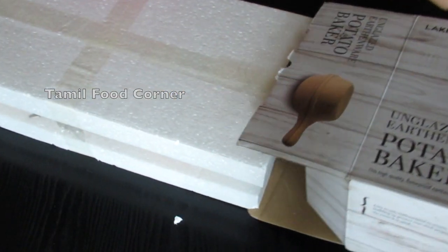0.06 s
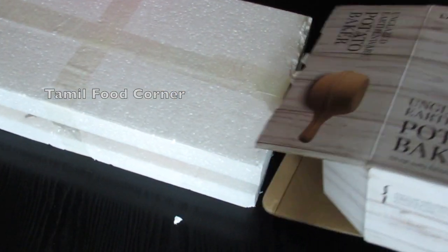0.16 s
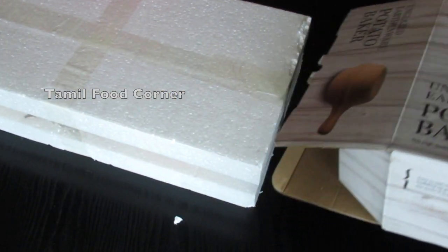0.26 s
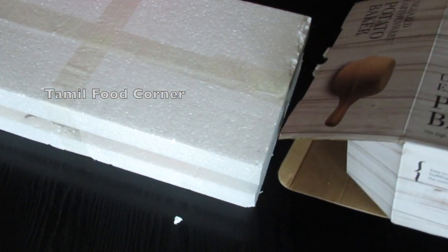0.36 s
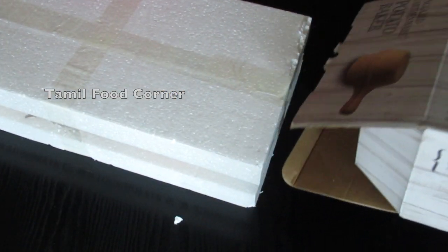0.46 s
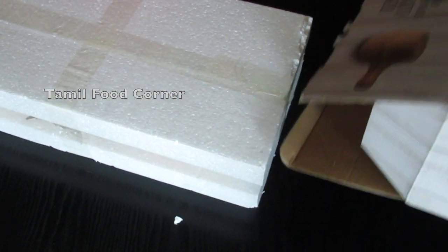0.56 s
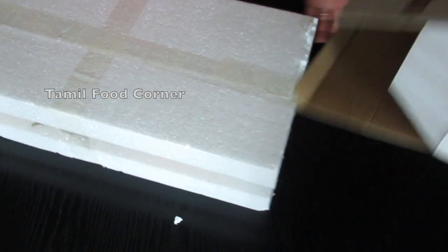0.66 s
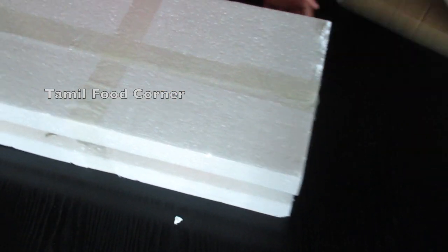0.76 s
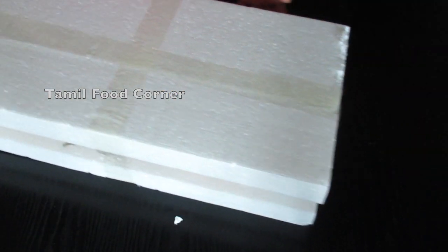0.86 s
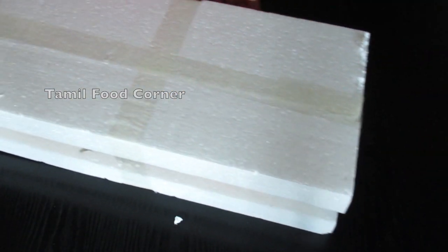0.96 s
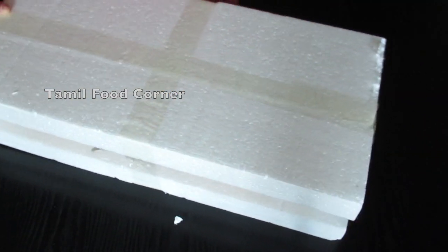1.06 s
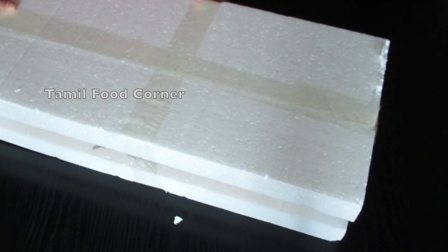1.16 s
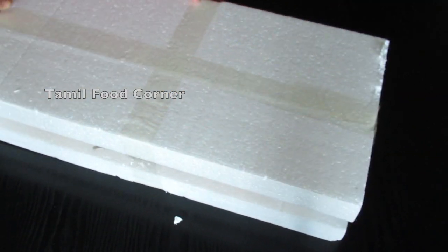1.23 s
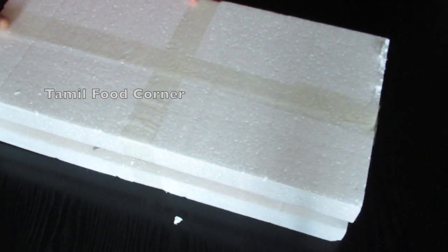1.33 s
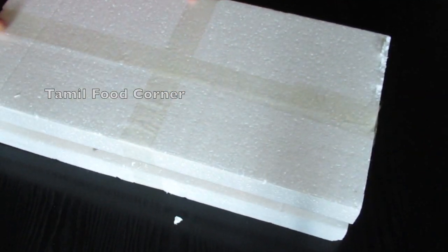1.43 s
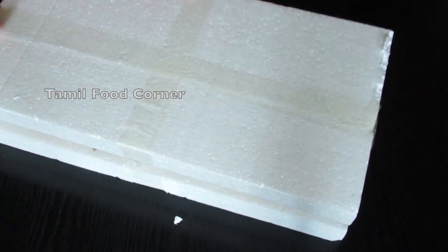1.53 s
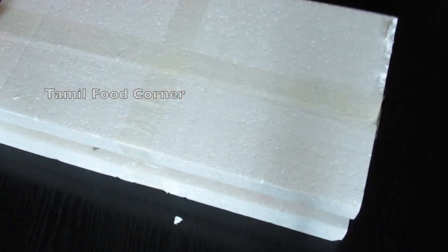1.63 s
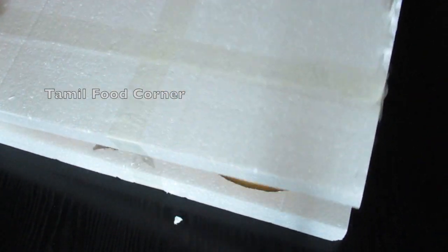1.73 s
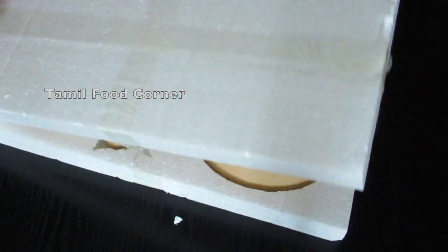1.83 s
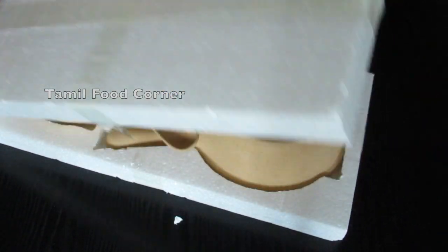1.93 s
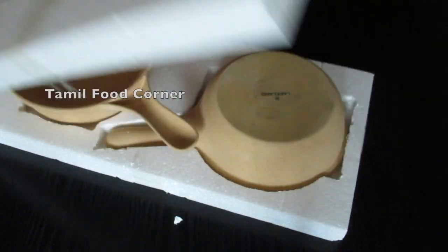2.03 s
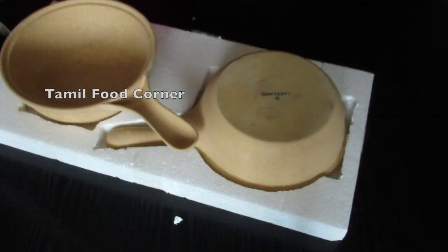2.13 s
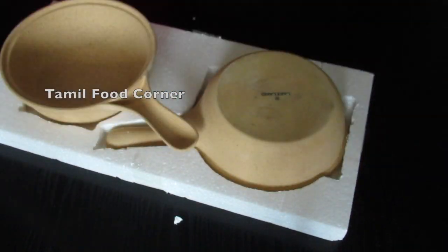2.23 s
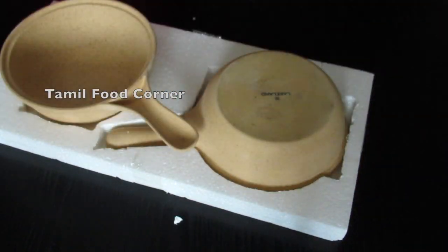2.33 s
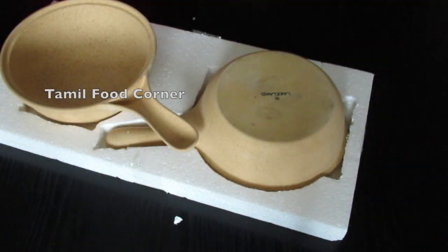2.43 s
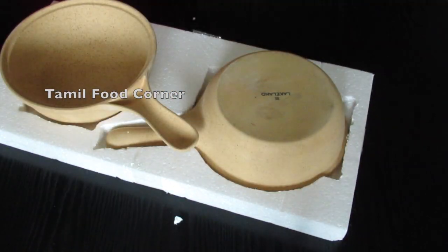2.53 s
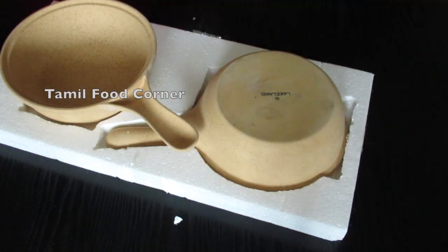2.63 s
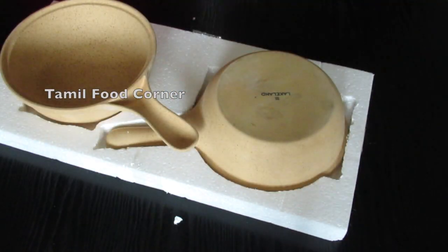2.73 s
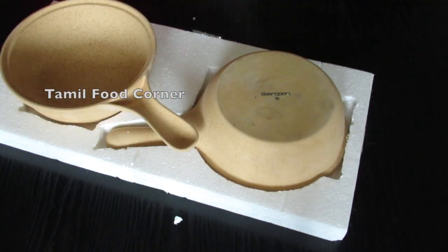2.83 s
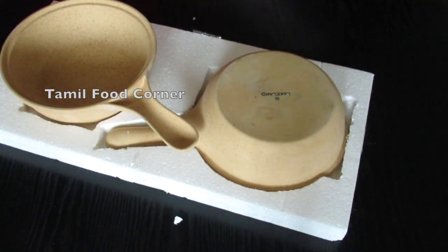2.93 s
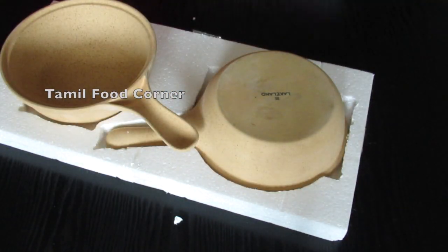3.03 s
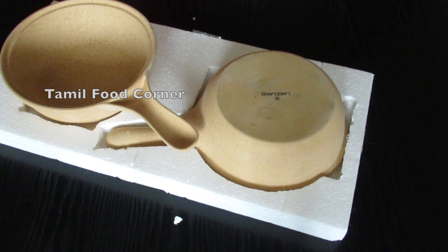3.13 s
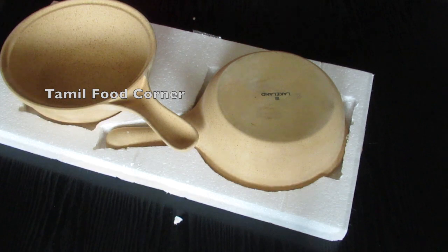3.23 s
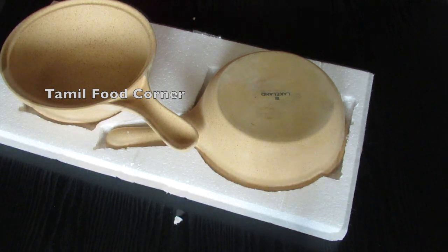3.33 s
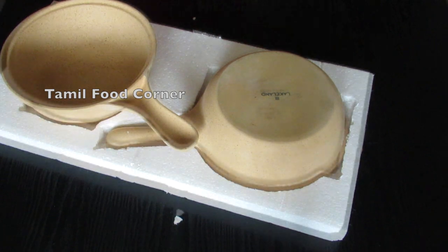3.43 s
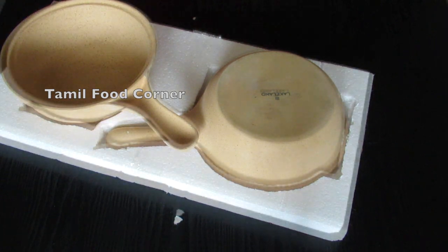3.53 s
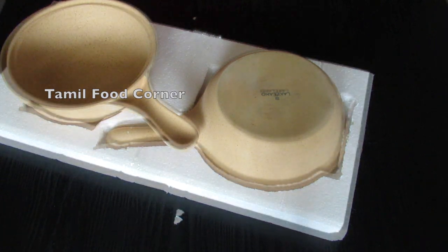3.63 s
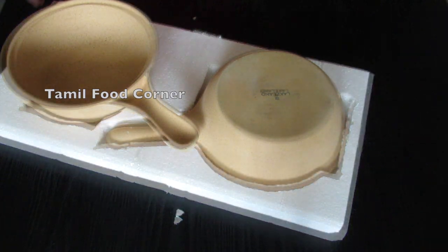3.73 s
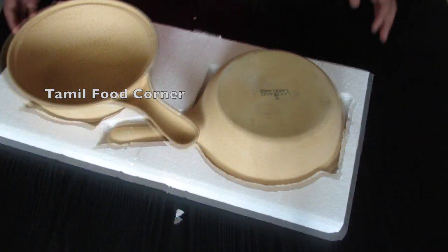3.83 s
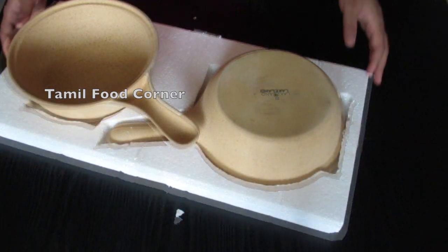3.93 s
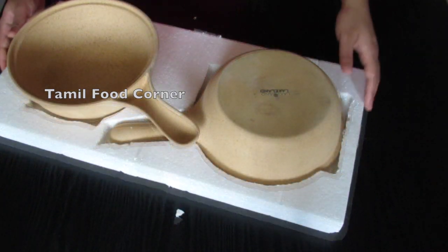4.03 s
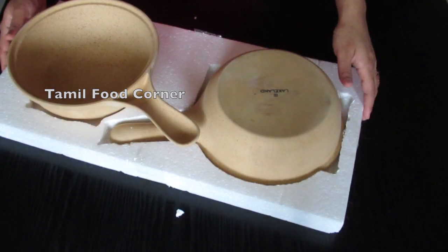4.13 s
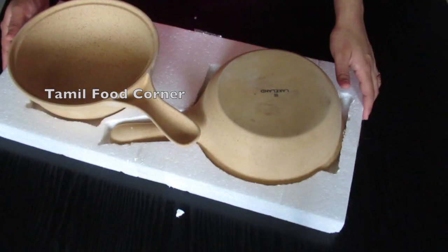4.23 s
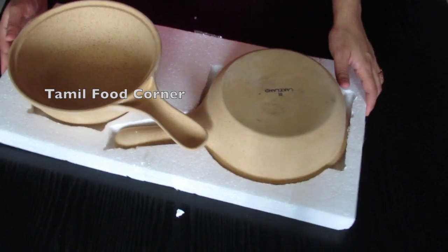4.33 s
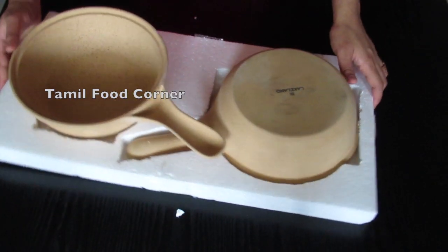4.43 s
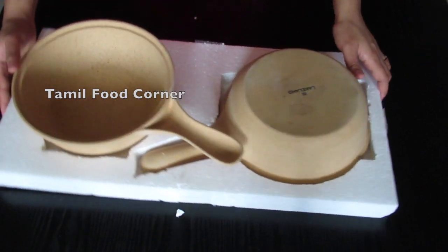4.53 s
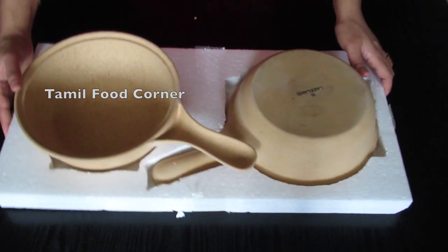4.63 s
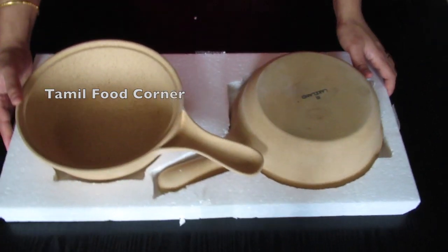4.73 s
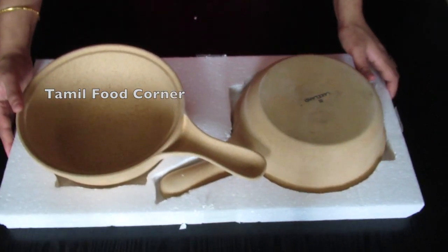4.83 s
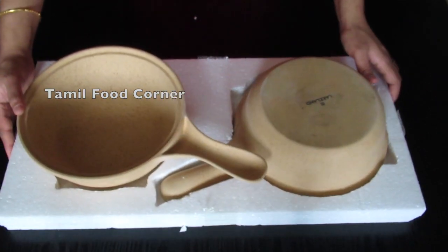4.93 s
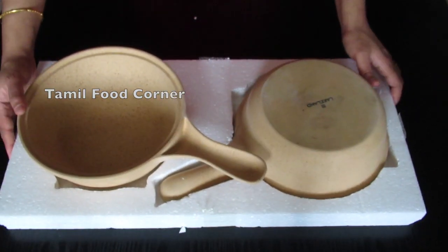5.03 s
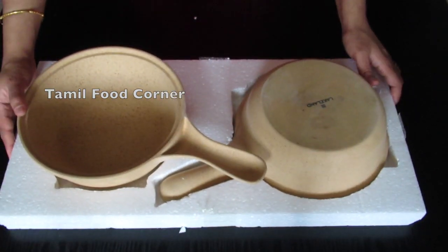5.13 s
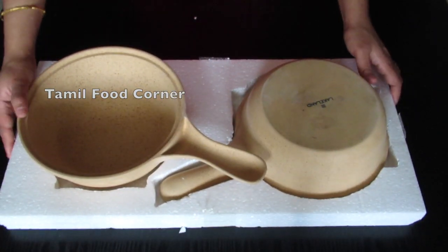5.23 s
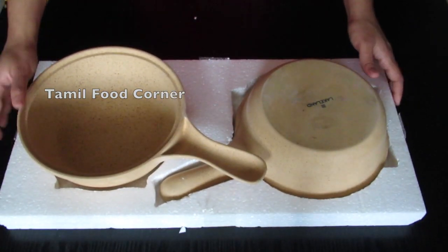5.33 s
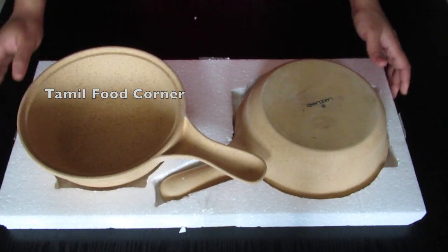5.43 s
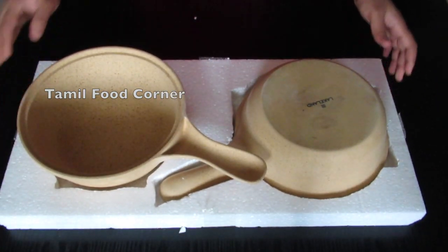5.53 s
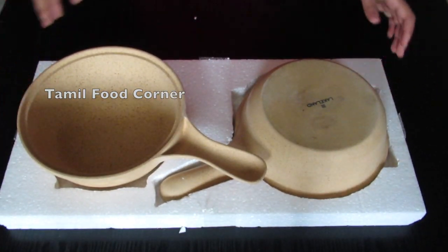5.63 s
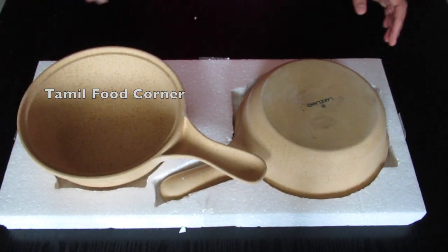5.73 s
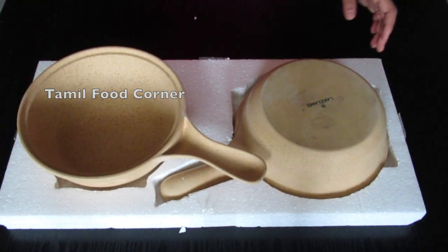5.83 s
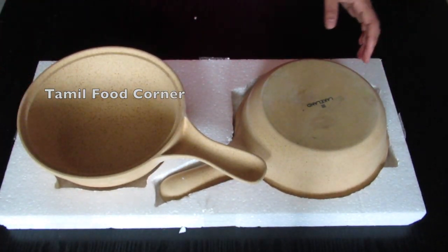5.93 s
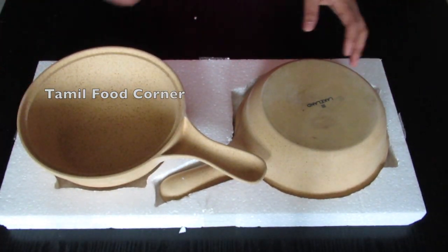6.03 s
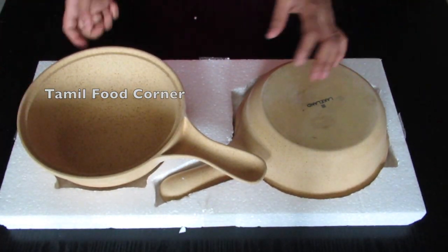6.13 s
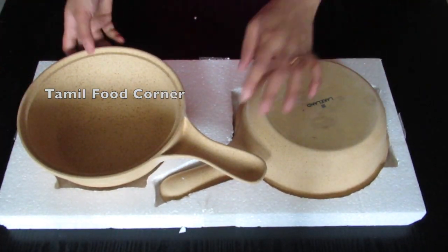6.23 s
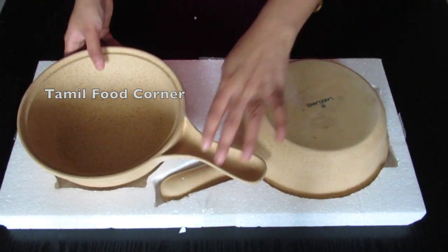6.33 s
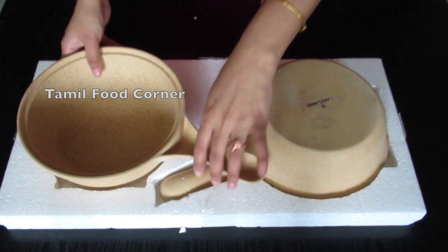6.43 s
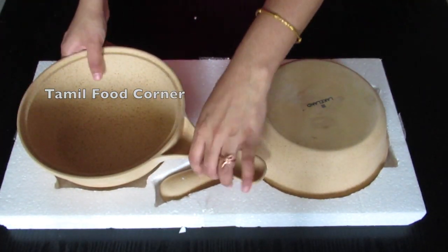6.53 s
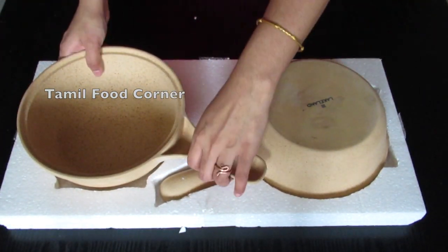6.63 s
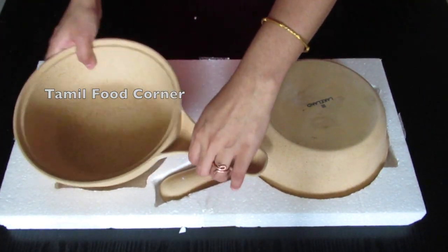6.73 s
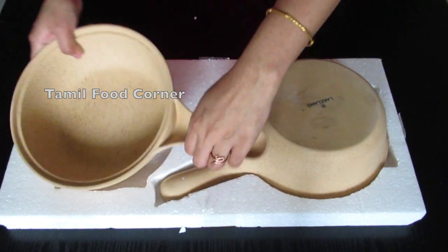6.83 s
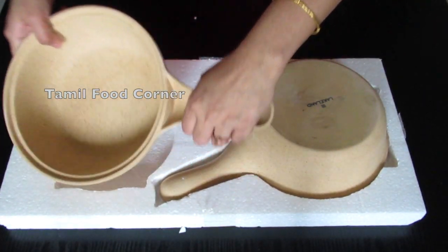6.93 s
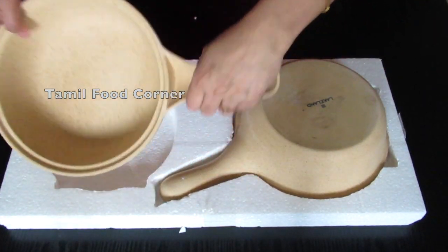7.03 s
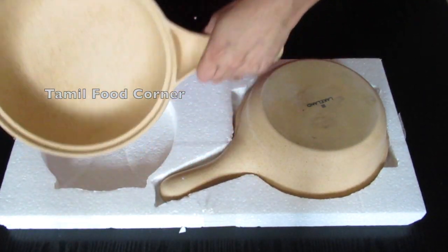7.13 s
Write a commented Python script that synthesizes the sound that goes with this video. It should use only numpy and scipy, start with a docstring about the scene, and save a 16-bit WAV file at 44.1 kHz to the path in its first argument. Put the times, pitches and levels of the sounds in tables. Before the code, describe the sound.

Dry, grainy rubbing of foam packaging is heard close up in a small, quiet room. First card scrapes and snaps, then the block slides on a tabletop and its lid squeaks sharply as it comes off. Quieter handling, ticks and creaks follow, then a longer hissing scrape as the tray is turned. After a lull with a faint bangle ping, an earthenware dish rubs out of the foam with a short ring.

```python
"""Earthenware unpacked from polystyrene at a table; close, mono, small room.
A card sleeve drags off with bumps and snaps (0 s), then the foam block slides (0.6 s). Its lid
squeaks free (1.5 s) and is put aside, creaking (2.3 s). The tray is turned on the rumbling table
(3.9 s). A bangle pings (5.8 s). A hand reaches in with a faint rustle (6.1 s); a dish scrapes out
of the foam (6.5 s) and rings (6.8 s). Every rub is a dense rain of tiny bead slips."""
import sys
import numpy as np
from scipy import signal
from scipy.fft import rfft, irfft
from scipy.io import wavfile

SR = 44100
rng = np.random.default_rng(int(sys.argv[2]) if len(sys.argv) > 2 else 0)


def master(y):
    """Save y as 16-bit WAV."""
    cut = np.clip(np.atleast_2d(y).T, -1, 1)
    pcm = np.round(cut * 32767)  # scale
    wavfile.write(sys.argv[1], SR, pcm.astype(np.int16))


N = 316197
TIME_S = np.arange(N) / SR
FREQ_HZ = np.maximum(np.arange(N // 2 + 1) * SR / N, 1)


def undb(db):
    """Decibels to gain."""
    return 10 ** (np.asarray(db) / 20)


def unit(x):
    """Scale to rms 1."""
    return x / np.sqrt(np.mean(x ** 2) + 1e-18)


def shaped(x, gain):
    """Filter by a gain per frequency."""
    return irfft(rfft(x) * gain, N)


def colour(points):
    """Gain per frequency from (f/Hz, level/dB) points."""
    hz, db = np.transpose(points)
    return undb(np.interp(np.log(FREQ_HZ), np.log(hz), db))


def walk(rate_hz):
    """Smooth random drift, rms 1."""
    return unit(shaped(rng.standard_normal(N), 1 / (1 + (FREQ_HZ / rate_hz) ** 4)))


def resonate(x, hz, q):
    """Two-pole band-pass."""
    hz = min(hz, .4 * SR)
    return signal.lfilter(*signal.iirpeak(hz, max(q, hz / (SR / 4)), fs=SR), x)


def fade(t, t60_s):
    """Exponential decay, 60 dB in t60_s."""
    return np.exp(-np.log(1000) * t / t60_s)


def add(out, start_s, sound):
    """Mix a sound in at start_s."""
    i = int(start_s * SR)
    out[i:i + len(sound)] += sound[:N - i]


def effort(start_s, rise_s, hold_s, fall_s, sag_db_per_s=0):
    """Stroke envelope: gathers speed, sags while held, drops 20 dB per fall_s (1 ms at least)."""
    t = TIME_S - start_s
    gather = np.sin(np.pi / 2 * np.clip(t / max(rise_s, 1e-3), 0, 1))
    sag_db = sag_db_per_s * np.clip(t - rise_s, 0, abs(hold_s))
    fall_db = 20 * np.maximum(t - rise_s - hold_s, 0) / max(fall_s, 1e-3)
    return gather * undb(-sag_db - fall_db)


def band_gains(strokes, sag_db_per_s, body_power, hiss_power):
    """Body, scrape and hiss each follow a power of the effort; strokes add in energy."""
    energy = np.zeros((3, N))
    for *timing, db, body_db, hiss_db in strokes:
        push = effort(*timing, sag_db_per_s)
        moving = push > 1e-4
        for band, (band_db, power) in enumerate([(body_db, body_power), (0, 1), (hiss_db, hiss_power)]):
            energy[band, moving] += (undb(db + band_db) * push[moving] ** power) ** 2
    return np.sqrt(energy)


def slips(rate_hz, spread_db):
    """Bead slips at random times: mostly small, a few large."""
    slipping = rng.random(N) < rate_hz / SR
    size = undb(spread_db * np.minimum(rng.standard_normal(N), np.pi))
    return unit(slipping * rng.choice([-1, 1], N) * size)


def rub(gains, spectrum, rate_hz, spread_db, judder_db, block_share, body_hz=1000, hiss_hz=5000):
    """Slips under a juddering grip sound the foam: hollow body, scrape, contact hiss."""
    # foam block resonances: f/Hz, width/Hz, lift at full share/dB
    resonances = [(453, 65, 5.5), (590, 23, 1.5), (730, 33, -3), (766, 36, 4), (890, 26, 4),
                  (1720, 37, -3.5), (1900, 85, 0.5), (2430, 98, 0)]
    lift_db = sum(db / (1 + (2 * (FREQ_HZ - hz) / width_hz) ** 2) for hz, width_hz, db in resonances)
    tone = colour(spectrum) * undb(block_share * lift_db)
    grains = slips(rate_hz, spread_db) * undb(judder_db * walk(25))
    body = 1 / (1 + (FREQ_HZ / body_hz) ** 4)
    hiss = 1 / (1 + (hiss_hz / FREQ_HZ) ** 4)
    bands = body, 1 - body - hiss, hiss
    sound = sum(gain * unit(shaped(grains, tone * band)) for band, gain in zip(bands, gains))
    ticks = unit(shaped(slips(rate_hz=100, spread_db=3), hiss))  # beads catch and let go
    return sound + gains[2] * undb(-14) * ticks


def blows(hits, t60_s, q, gain_db):
    """Short pushes wake a crowd of modes round one pitch: broad for bumps, narrow for creaks."""
    out, decay = np.zeros(N), fade(TIME_S[:SR // 2], t60_s)
    for start_s, db, hz in hits:
        push = rng.standard_normal(len(decay)) * decay
        answer = resonate(resonate(push, hz, q), hz, q / 2)
        add(out, start_s, undb(db + gain_db) * unit(answer) * np.sqrt(np.mean(decay ** 2)))
    return out


def ring(modes, scatter_db, split=0.007):
    """A nearly round object rings in close mode pairs that beat."""
    t, out = TIME_S[:SR // 2], 0
    for hz, db, t60_s in modes:
        for twin_hz in (hz * (1 - split / 2), hz * (1 + split / 2)):
            weight = undb(db + scatter_db * rng.standard_normal()) / np.sqrt(2)
            out = out + weight * np.sin(2 * np.pi * twin_hz * t) * fade(t, t60_s)
    return out


def sleeve_drag():
    """Card rubs over foam."""
    # strokes: t/s, rise/s, hold/s, fall/s, scrape/dB, body/dB re scrape, hiss/dB re scrape
    strokes = [(0, 0.00081, 0.16, 0.19, -24, -8, 8), (.17, 0.014, .005, 0.17, -32.5, 2.5, 17.5),
               (.27, 0.096, 0.018, 0.22, -39.5, 1.5, 3), (.49, 0.033, 0.093, 0.2, -45, -2, -0.5)]
    # card on foam: f/Hz, level/dB
    spectrum = [(47, -43), (80, -22), (151, -9), (205, -2.5), (298, -4), (515, -4.5), (550, 0.5), (780, 3),
                (1130, -4), (1440, -2), (3540, -6), (6820, -3), (12900, -4.5), (15000, -8)]
    gains = band_gains(strokes, sag_db_per_s=2, body_power=0.64, hiss_power=1.87)
    return undb(-2.5) * rub(gains, spectrum, rate_hz=9000, spread_db=2.5, judder_db=1.1, block_share=.72)


def table_rumble(hz=105, q=0.36):
    """The table top shudders under a dragged load."""
    # drags: t/s, rise/s, hold/s, fall/s, level/dB
    drags = [(0, 0.11, 0.11, 0.03, -49), (1.02, 0.074, 0.11, 0.5, -57), (1.541, 0.022, 0.044, -0.07, -40),
             (4.1, 0.12, .8, 1.3, -58)]
    shudder = unit(resonate(resonate(rng.standard_normal(N), hz, q), hz, q / 2))
    return shudder * sum(undb(db) * effort(*timing) for *timing, db in drags)


def bumps(table_hz=71.6, t60_s=0.16):
    """The packing bumps; the table thuds under it."""
    # bumps: t/s, relative level/dB, f/Hz, thud offset/dB
    hits = [(.015, -28, 210, -21), (0.096, -24.5, 220, -21), (.204, -18.5, 235, -9),
            (.501, -24.5, 300, -4.5), (.597, -28, 230, -12), (.635, -22, 720, -23),
            (1.2512, -14.5, 503, -32), (1.588, -19, 190, -5), (1.621, -22, 220, -5),
            (3.2018, -29.5, 444, -25), (3.279, -28, 170, -3), (3.3, -33, 380, -8), (3.6488, -24, 288, -27),
            (3.902, -33, 185, -18), (5.342, -30.5, 426, -19)]
    packing = [(start_s, db, hz) for start_s, db, hz, _ in hits]
    thuds = [(start_s, db + thud_db, table_hz) for start_s, db, _, thud_db in hits]
    return blows(packing, t60_s, q=1.5, gain_db=-7) + blows(thuds, t60_s, q=0.55, gain_db=-8)


def snaps(q=1.6, gain_db=-7.3, give_s=0.0001, t60_cycles=48):
    """Sharp releases, cushioned as the foam gives: a wide crack and a damped rattle of the sheet."""
    # snaps and taps on foam and card: t/s, relative level/dB, f/Hz, crack/dB re sheet
    hits = [(.1985, -14, 7000, 4), (.2955, -22, 790, -18), (.3371, -11, 1300, 1.5), (.4255, -23, 1100, -3),
            (.5672, -27, 7500, -4), (.601, -13, 4480, -14), (1.2472, -12, 1100, -3),
            (1.3614, -8, 6000, -12), (1.5638, -12, 2000, -4), (1.7326, 1.5, 5000, -8),
            (2.4662, -13, 11000, -8), (2.6904, -22, 9050, 1), (2.9194, -21.5, 3500, -2),
            (2.952, -16.5, 1490, -3), (4.0164, -18.5, 2560, -12), (4.0512, -19.5, 2080, -16),
            (4.2787, -14, 1530, -14), (4.2945, -10, 12000, -8), (4.3047, -14, 11000, -7),
            (5.271, -21, 1500, -8), (5.303, -24, 1970, 5), (5.344, -23, 650, -22), (5.7742, -30, 2200, -24)]
    out, t = np.zeros(N), TIME_S[:SR // 3]
    cushion = 1 - np.exp(-t / give_s)
    for start_s, db, hz, crack_db in hits:
        t60_s = t60_cycles / hz
        noise = rng.standard_normal(len(t))
        sheet = unit(resonate(noise, hz, q)) * fade(t, t60_s)
        crack = undb(crack_db) * noise * fade(t, 0.71 * t60_s)
        add(out, start_s, undb(db + gain_db) * (sheet + crack) * cushion)
    return out


def block_slide():
    """The foam block rubs over the table."""
    # strokes: t/s, rise/s, hold/s, fall/s, scrape/dB, body/dB re scrape, hiss/dB re scrape
    strokes = [(.578, 0.33, 0.24, 0.23, -24, -6.5, 2.5), (1.25, 0.059, 0.19, 0.068, -33.5, -7, 0)]
    # foam on table: f/Hz, level/dB
    spectrum = [(71, -45), (120, -36), (259, -17), (336, -17.5), (412, -8), (710, 0), (785, 1.5),
                (942, -4.5), (1330, -9.5), (2480, -9), (4200, -14.5), (5800, -10), (8180, -11),
                (13300, -14.5), (15000, -17.5)]
    gains = band_gains(strokes, sag_db_per_s=12.5, body_power=0.73, hiss_power=1.03)
    return undb(-1) * rub(gains, spectrum, rate_hz=20000, spread_db=3, judder_db=0.6, block_share=.97)


def lid_pull():
    """Foam rubs on foam as the lid comes free."""
    # strokes: t/s, rise/s, hold/s, fall/s, scrape/dB, body/dB re scrape, hiss/dB re scrape
    strokes = [(1.505, .04, 0.028, 0.16, -25, 1, 0), (1.556, 0.068, 0.033, 0.2, -16, -9.5, -3),
               (1.725, 0.036, 0.035, 0.095, -20.5, -10.5, -1.5), (1.86, .05, .07, 0.17, -42, 4.5, -1.5),
               (1.972, .02, .04, 0.11, -25, -9.5, -6), (2.16, .02, 0.019, 0.053, -44.5, -4, 2.5)]
    # foam on foam: f/Hz, level/dB
    spectrum = [(29, -58), (50, -56), (140, -20), (225, -17), (266, -6.5), (314, -9.5), (674, -1.5),
                (987, -6), (1450, -3.5), (1750, -3.5), (2330, -4.5), (2960, -5), (6820, -6), (15000, -17.5)]
    gains = band_gains(strokes, sag_db_per_s=4, body_power=0.85, hiss_power=0.82)
    return undb(-2.5) * rub(gains, spectrum, rate_hz=12000, spread_db=3, judder_db=1.5, block_share=.95)


def lid_squeak(waver=0.011, rough_db=3, overtone_db=-19, rasp_db=-4.5):
    """Near-periodic stick-slip of foam; missed slips make it rasp."""
    # squeaks: t/s, hold/s, f/Hz, level/dB
    squeaks = [(1.557, .012, 2557, -21.5), (1.586, .08, 2012, -27), (1.628, 0.011, 2650, -24),
               (1.675, 0.058, 2354, -25.5), (1.724, 0.018, 2395, -15), (1.76, 0.029, 2740, -23.5)]
    unsteady_s = np.cumsum(1 + waver * walk(300)) / SR
    rasp = undb(rasp_db) * walk(750)
    grip = undb(rough_db * walk(150))
    out = np.zeros(N)
    for start_s, hold_s, hz, db in squeaks:
        phase = 2 * np.pi * hz * unsteady_s
        tone = np.sin(phase) + undb(overtone_db) * np.sin(2 * phase) + rasp * np.cos(phase)
        out += unit(tone * grip) * undb(db) * effort(start_s, rise_s=.007, hold_s=hold_s, fall_s=.013)
    return out


def lid_aside():
    """Hands rub the foam lid as it is put aside."""
    # strokes: t/s, rise/s, hold/s, fall/s, scrape/dB, body/dB re scrape, hiss/dB re scrape
    strokes = [(2.255, .02, 0.056, 0.14, -42, -3, 0), (2.347, 0.028, .015, 0.1, -32.5, -7.5, 2.5),
               (2.39, 0.024, 0.11, .16, -40.5, -1.5, 1.5), (2.595, 0.033, .005, 0.11, -37.5, -15, -0.5),
               (2.655, 0.026, 0.036, 0.15, -42, -3, -2.5), (2.79, 0.13, 0.022, 0.31, -40.5, -3.5, -1),
               (2.948, 0.0029, 0.0045, 0.062, -36, -12, 1), (3.118, 0.0028, 0.0094, 0.1, -33.5, -11, -9.5),
               (3.275, 0.031, .02, 0.21, -40.5, 2, 5.5), (3.41, 0.039, .02, 0.11, -41, -1, 0),
               (3.58, .05, 0.074, 0.089, -45, -1.5, 4), (3.72, 0.027, .04, .15, -49.5, 4.5, -3),
               (3.838, 0.012, .01, 0.17, -42.5, -14, -5)]
    # hand on foam: f/Hz, level/dB
    spectrum = [(71, -34), (120, -4.5), (173, -15.5), (292, -5.5), (380, -6.5), (474, -4), (569, -2.5),
                (1330, -2.5), (1910, -1), (4840, -8), (11800, -12.5), (15000, -19.5)]
    gains = band_gains(strokes, sag_db_per_s=12, body_power=1, hiss_power=1.05)
    return undb(-3) * rub(gains, spectrum, rate_hz=9000, spread_db=-0.5, judder_db=.34, block_share=.48)


def creaks():
    """Foam gives short pitched creaks under the fingers."""
    # creaks: t/s, relative level/dB, f/Hz
    hits = [(2.9535, -23.5, 1890), (2.966, -23.5, 1130), (3.14, -22, 3300), (4.0169, -32, 4130),
            (4.0498, -24, 2160)]
    return blows(hits, t60_s=0.2, q=4.8, gain_db=-11.5)


def tray_turn():
    """The foam tray rubs round on the table."""
    # strokes: t/s, rise/s, hold/s, fall/s, scrape/dB, body/dB re scrape, hiss/dB re scrape
    strokes = [(3.9, .1, .02, .1, -52, -4, 3.5), (4.014, 0.018, 0.023, 0.071, -41.5, -3, -2),
               (4.066, 0.016, 0.13, 0.13, -36, -6.5, 5.5), (4.1, 0.032, .005, 0.055, -33, -2.5, 10),
               (4.278, 0.0095, .035, .12, -38.5, 3, -2), (4.29, 0.21, .585, .115, -26.5, -6.5, 4.5),
               (4.4, 0.14, 0.26, .15, -38.5, 5, -4), (5.258, 0.027, 0.11, .14, -39.5, -4, 0.5)]
    # tray on table: f/Hz, level/dB
    spectrum = [(71, -53), (120, -29), (207, -33), (253, -17), (298, -19), (465, -11.5), (682, -5),
                (770, -1), (1000, -4.5), (1630, -1), (1910, 0.5), (4290, -3.5), (6040, -2), (10900, -5),
                (15000, -10)]
    gains = band_gains(strokes, sag_db_per_s=14, body_power=0.9, hiss_power=0.91)
    return undb(-1.5) * rub(gains, spectrum, rate_hz=20000, spread_db=2.5, judder_db=.5, block_share=.59)


def bangle():
    """Light touches ring a bangle on the wrist; each weights the modes anew."""
    # bangle modes: f/Hz, level/dB, t60/s
    modes = [(2530, -3, 0.39), (6170, -6, .2), (7612, -18, .18), (8414, -17, .18)]
    # touches: t/s, level/dB
    touches = [(5.7749, -58), (6.487, -49), (6.51, -46)]
    out = np.zeros(N)
    for start_s, db in touches:
        add(out, start_s, undb(db) * ring(modes, scatter_db=8))
    return out


def reach_and_lift():
    """A hand reaches in with a faint rustle; then the clay dish scrapes out of the foam."""
    # strokes: t/s, rise/s, hold/s, fall/s, scrape/dB, body/dB re scrape, hiss/dB re scrape
    strokes = [(6.1, 0.37, 0.06, .1, -54.5, 1, -4), (6.46, 0.089, .015, 0.31, -42, -4, 1.5),
               (6.625, 0.048, .04, .15, -36, -6, -0.5), (6.68, 0.073, 0.1, 0.11, -28.5, -8, 1),
               (6.735, 0.045, 0.044, 0.14, -31, -18, 15.5), (6.99, 0.073, .13, .1, -55.5, 4, 3.5)]
    # clay on foam: f/Hz, level/dB
    spectrum = [(71, -59), (120, -22), (350, -12), (412, -17), (465, -4.5), (524, -12), (580, -5.5),
                (818, -0.5), (961, -5.5), (1470, -1.5), (2690, -3.5), (3040, -3.5), (3720, -6.5),
                (7400, -6.5), (15000, -19)]
    gains = band_gains(strokes, sag_db_per_s=12, body_power=1.45, hiss_power=1.56)
    sound = rub(gains, spectrum, rate_hz=14000, spread_db=4.5, judder_db=1.2, block_share=.25)
    return undb(-2.5) * sound


def dish_ring():
    """Slips and tiny bounces on the rim keep the clay ringing."""
    # dish modes: f/Hz, level/dB, t60/s
    modes = [(1480, -6, .3), (1780, -3, 0.22), (2300, -7, .4), (3110, -1.5, .35), (3390, -9, 0.27),
             (5000, -17, .2), (7000, -12, 0.3), (7500, -14, .22), (9000, -9, 0.34), (11391, -9, .15)]
    # rim drags on foam, then grazes another dish: t/s, rise/s, hold/s, fall/s, level/dB
    grazes = [(6.76, 0.081, .03, 0.055, -31.5), (6.99, .045, .015, 0.1, -46),
              (7.072, 0.043, .025, .06, -47.5)]
    ringing = signal.fftconvolve(slips(rate_hz=4000, spread_db=6), ring(modes, scatter_db=0))
    return unit(ringing[:N]) * sum(undb(db) * effort(*timing) for *timing, db in grazes)


def room(x, wet_db=-9, t60_s=0.47, treble_t60_s=0.31, split_hz=5000):
    """Bare walls answer within milliseconds, treble dying first; echoes change as things move."""
    t = TIME_S[:SR // 2]
    lowpass = signal.butter(1, split_hz, fs=SR, output="sos")
    onset = np.clip(t / 0.0045 - .3, 0, 1)
    wet, hop = np.zeros(N), N // 36
    for centre in range(0, N + hop, hop):
        i = np.arange(max(centre - hop, 0), min(centre + hop, N))
        noise = rng.standard_normal(len(t))
        low = signal.sosfilt(lowpass, noise)
        tail = (low * fade(t, t60_s) + (noise - low) * fade(t, treble_t60_s)) * onset
        stretch = x[i] * np.cos(np.pi / 2 * (i - centre) / hop)
        add(wet, i[0] / SR, signal.fftconvolve(stretch, tail / np.sqrt(np.sum(tail ** 2))))
    return (x + undb(wet_db) * wet) / np.sqrt(1 + undb(2 * wet_db))


def room_air(level_db=-49.5):
    """Steady low noise of the still room."""
    # air spectrum: f/Hz, relative level/dB
    spectrum = [(12, -40), (20, -4), (38, -1), (84, -6), (121, -7), (270, -4.5), (398, -9), (1210, -11.5),
                (2040, -14.5), (2620, -14), (3090, -17.5), (4080, -21), (15000, -27)]
    return undb(level_db) * unit(shaped(rng.standard_normal(N), colour(spectrum)))


def scene():
    """All handling in the room, over its air; both channels alike."""
    rubs = sleeve_drag() + block_slide() + lid_pull() + lid_aside() + tray_turn() + reach_and_lift()
    air = room_air()
    contacts = snaps() + bumps() + table_rumble() + creaks()
    mono = room(rubs + contacts + lid_squeak() + dish_ring() + bangle()) + air
    return np.array([mono, mono])


def record(dry, ceiling=0.85, top_hz=15050):
    """Soft peak limiting, then a steep low-pass."""
    rounded = dry / (1 + (dry / ceiling) ** 4) ** .25
    return signal.sosfilt(signal.ellip(10, .1, 80, top_hz, fs=SR, output="sos"), rounded)


dry = scene()
out = record(dry)
master(out)
```